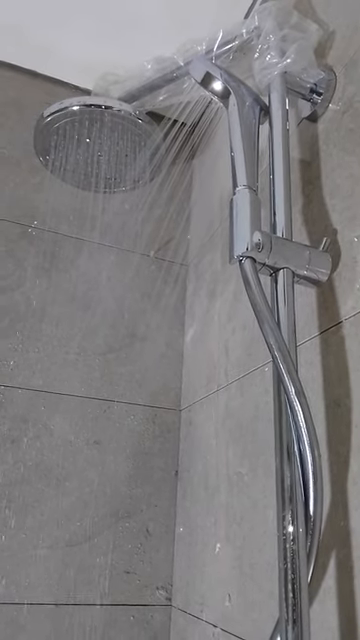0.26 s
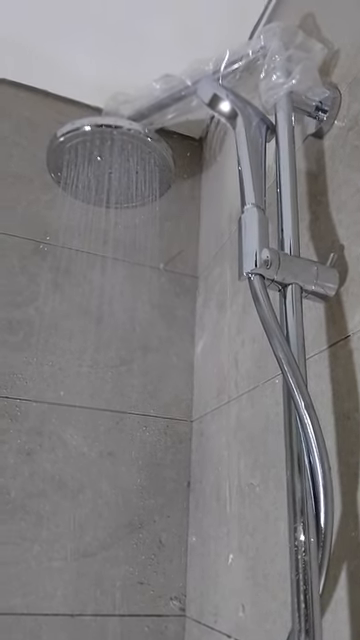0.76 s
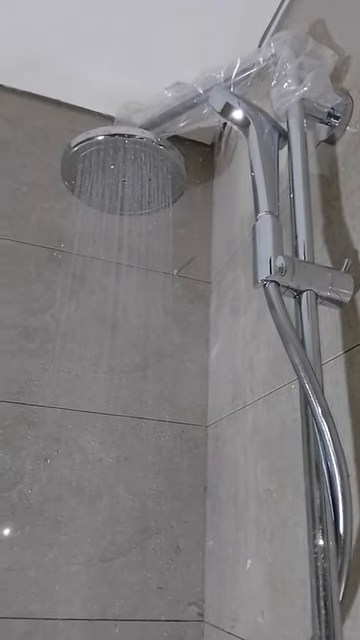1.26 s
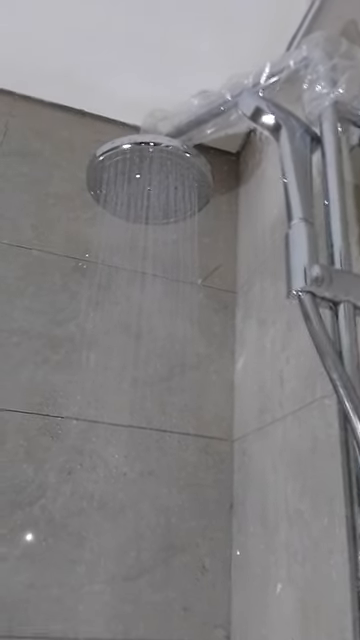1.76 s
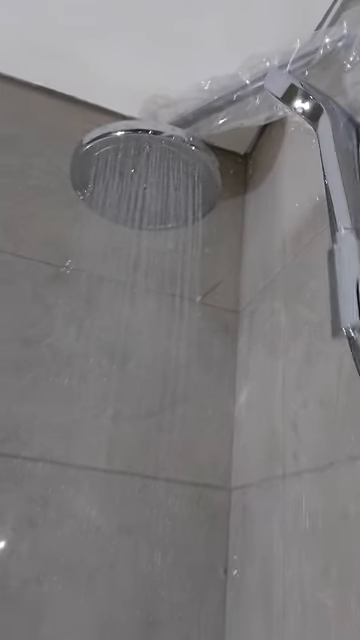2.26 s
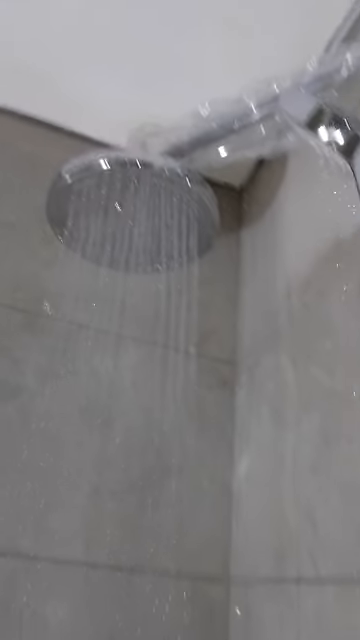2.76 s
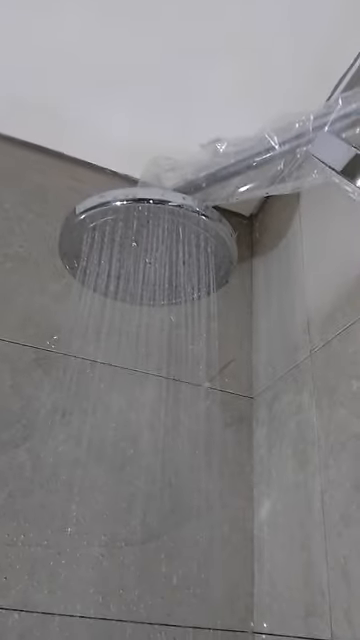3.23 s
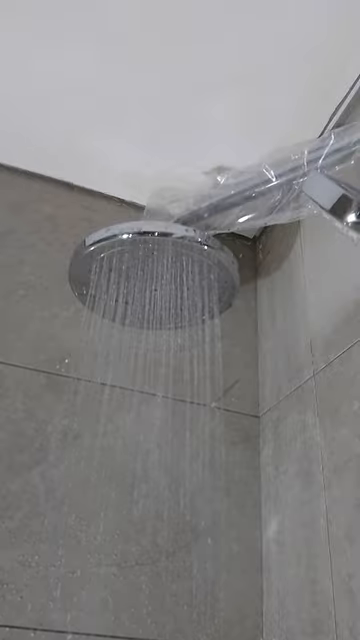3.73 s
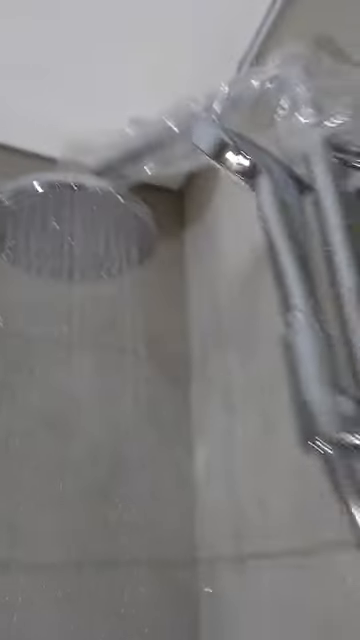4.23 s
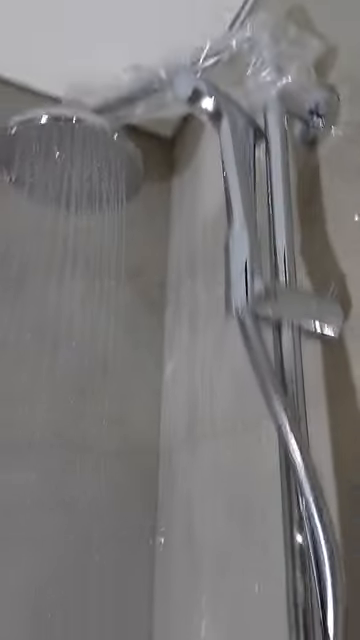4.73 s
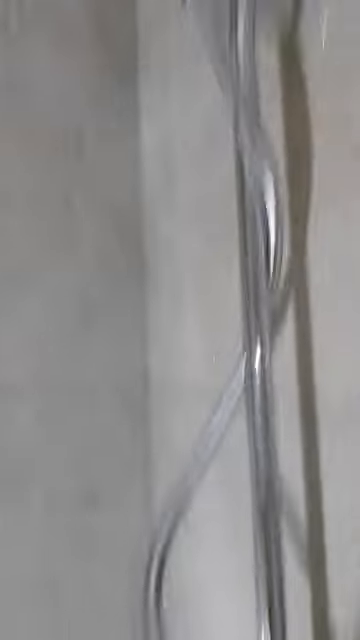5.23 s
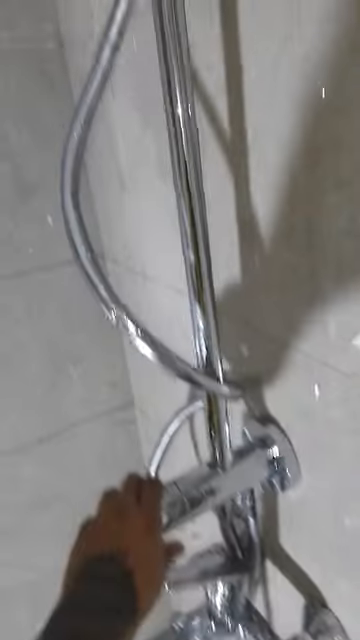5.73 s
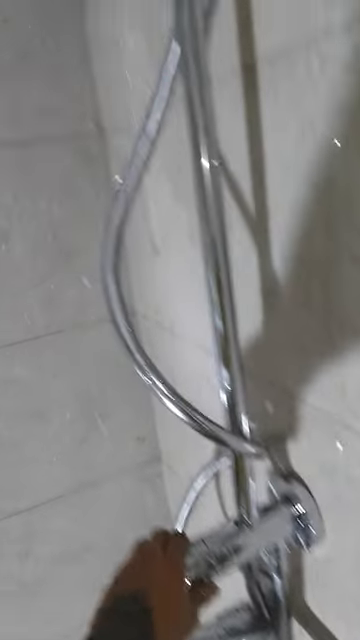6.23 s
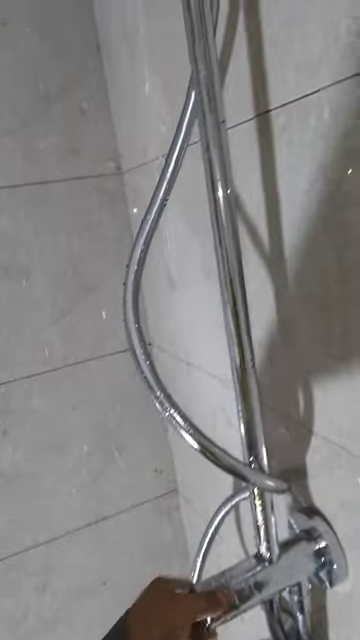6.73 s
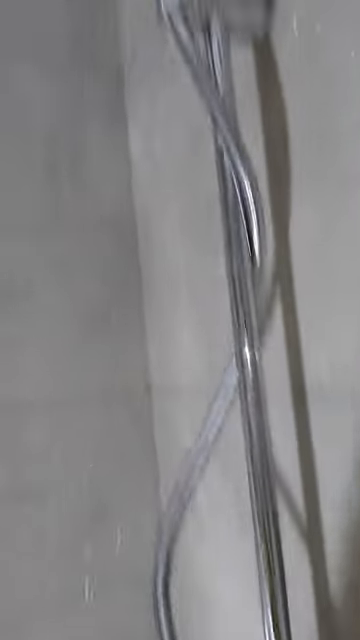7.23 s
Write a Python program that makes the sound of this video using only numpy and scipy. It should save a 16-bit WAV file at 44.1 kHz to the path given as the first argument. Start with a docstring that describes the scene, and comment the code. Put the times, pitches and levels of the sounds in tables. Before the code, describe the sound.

Shower water is already running at 0 s, with a brief stronger splash that at once drops to a thin, very bright hiss. Small spurts follow at 0.2-1.2 s, with sharp ticking drops and wet spits near 0.36 and 1.2 s. At 1.3 s the spray jumps fuller and stays steady, with a faint airy whistle until 2.4 s. From 2.6 to 3.3 s hollow ringing colours the water and close drops snap in clusters; more snap until 4.6 s, with soft dull taps. From 5 to 5.5 s the microphone lowers: the hiss reaches deeper and floor patter emerges. Level flickers at 5.5-5.7 s, and the clearest knock comes at 5.8 s. A splat, gurgle and hollow ring come near 6.55 s. From 6.9 s the microphone rises, and the spray weakens and thins, still running at 7.5 s. Tiled echo, faint rumble and hum stay beneath.

```python
"""In a tiled bathroom an overhead shower runs: the hand spray at first, then the rain head takes the whole flow.
Countless tiny noise puffs and pings make a bright hiss, and slower puffs a duller splash, with swelling bands.
Near drops snap as short high tones; blobs spit, bands of noise ring like hollows, and soft taps knock dully.
Water on the floor, low rumble (both shaped noise) and a faint mains hum (a sine) lie below. One hand-carried
microphone is lowered towards the mixer for a while: the hiss reaches lower there and the floor is louder."""
import sys
import numpy as np
from scipy import signal
from scipy.fft import rfft, irfft, next_fast_len
from scipy.io import wavfile
from scipy.ndimage import uniform_filter1d, map_coordinates

SR = 44100
rng = np.random.default_rng(int(sys.argv[2]) if len(sys.argv) > 2 else 0)


def persist_wave(psi):
    """Save psi, clipped to +-1, as 16-bit WAV."""
    counts = np.round(np.clip(psi, -1, 1) * 32767).astype(np.int16)
    wavfile.write(sys.argv[1], SR, np.atleast_2d(counts).T)


N = 329868  # length [samples]

# Strength of the spray at the microphone, before spurts and flutter: (time [s], level [dB])
SPRAY_LEVEL = [(0.0, -18.5), (0.08, -24), (0.3, -24), (0.6, -22.5), (0.71, -23), (1.1, -22.7), (1.27, -23),
               (1.3, -18), (1.54, -19.5), (2.3, -20), (2.7, -19), (3.6, -19.5), (4.15, -18), (4.22, -19.5),
               (4.92, -19.5), (5.15, -20), (5.42, -18.5), (5.48, -22), (5.57, -18.5), (5.63, -21.5),
               (5.71, -19), (6.1, -20.2), (6.86, -20.5), (7.23, -25.5), (7.48, -23.5)]
# Colour of the hiss, also used for the echo of the big drops: (frequency [Hz], relative level [dB per Hz])
HISS_COLOUR = [(3000, -12), (4200, -22), (5300, -18), (6500, -12), (8000, -7), (9200, -2.5), (10300, 1.65),
               (11200, 0.4), (12500, -3), (14000, -5.5), (15700, -8)]


def amp(db):
    """Turn decibels into a plain multiplier."""
    return 10 ** (np.asarray(db) / 20)


def unit(x):
    """Scale a sound to an average strength (rms) of 1."""
    return x / np.sqrt(np.mean(x ** 2) + 1e-20)


def along(points, hz):
    """Read a value at each frequency from (Hz, value) points, on a log frequency axis."""
    point_hz, values = np.transpose(points)
    return np.interp(np.log(hz + 1), np.log(point_hz + 1), values)


def curves(rows):
    """Draw one value per sample for each column after the time."""
    times, *columns = np.transpose(rows)
    return [np.interp(np.arange(N) / SR, times, column) for column in columns]


def wobble(rate):
    """Draw a smooth random curve through rate random points a second."""
    knots = rng.standard_normal(int(N * rate / SR) + 4)
    return map_coordinates(knots, [np.arange(N) * rate / SR])


def filtered(x, response):
    """Multiply each frequency in x by response(hz)."""
    size = next_fast_len(len(x) + SR // 4)  # spare room so the end does not wrap onto the start
    spectrum = rfft(x, size) * response(np.fft.rfftfreq(size, 1 / SR))
    return irfft(spectrum, size)[:len(x)]


def coloured(x, spectrum):
    """Shape x by the given (Hz, dB) spectrum, at rms 1."""
    return unit(filtered(x, lambda hz: amp(along(spectrum, hz))))


def add(track, start_s, sound):
    """Mix a short sound into the track at its start time."""
    part = track[round(start_s * SR):][:len(sound)]
    part += sound[:len(part)]


def impacts(rate, spread_db):
    """Drops land at random, rate a second, as single clicks of varied size and either sign, at rms 1."""
    lands = rng.random(N) < rate / SR
    size = amp(spread_db * np.minimum(rng.standard_normal(N), 2.4))  # no giant drops
    return unit(lands * size * rng.choice([-1, 1], N))


def scatter(x, t60):
    """Every impact in x leaves a puff of noise that falls 60 dB in t60 seconds; the energy is kept."""
    keep = amp(-60 / (t60 * SR)) ** 2  # energy left after one sample
    energy = signal.lfilter([1 - keep], [1, -keep], x ** 2)
    return np.sqrt(energy) * rng.standard_normal(N)


def tiled_room(x, t60, wet_db):
    """Each drop lands somewhere else, so each has its own diffuse echo off the tiles."""
    return x + amp(wet_db) * scatter(x, t60)


def lowered():
    """Microphone position: 0 up by the shower head, 1 down by the mixer."""
    lower_s, raise_s, move_s = 4.94, 6.9, 0.57  # start of each move, and the length of both
    t = np.arange(N) / SR
    return np.clip((t - lower_s) / move_s, 0, 1) - np.clip((t - raise_s) / move_s, 0, 1)


def spurts():
    """Spurts of heavier water change the splash and hiss gains [dB] quickly, then die back."""
    # Spurts: (time [s], splash gain [dB], hiss gain [dB])
    spurt_rows = [(0, 7, 0), (.225, 2.5, 0), (.35, 1.5, 2.5), (.51, -1, 3), (.84, 2, 4), (1.18, 0.5, 3),
                  (2.09, 3, 3), (2.66, 2, 3), (2.97, 1.5, 4), (3.11, 0.5, 2.5), (3.44, 1, 2),
                  (5.76, 1, 0.5), (6.55, 4, -0.5), (6.67, 1, 2.5), (7.28, 0, 2.5), (7.37, 3, 2.5)]
    rise_s = 0.013  # time to the top of a spurt
    start_s, *gains_db = np.transpose(spurt_rows)
    u = np.maximum(np.arange(N) / SR - start_s[:, None], 0) / rise_s
    return np.array(gains_db) @ (u * np.exp(1 - u))


def tiny_bubbles(count, low_hz, high_hz, spread_db):
    """Drops trap tiny bubbles that ping for about two milliseconds, each at its own pitch."""
    t = np.arange(SR // 300) / SR
    hz = rng.uniform(low_hz, high_hz, (count, 1))
    size = np.minimum(rng.standard_normal((count, 1)), 2.2)
    level = amp(spread_db * size - 60 * t / 0.0021)  # falls 60 dB in 2.1 ms
    attack = (1 - np.exp(-t / 0.00015)) ** 2
    pings = level * attack * np.sin(2 * np.pi * hz * t)
    where = rng.integers(0, N, (count, 1)) + np.arange(len(t))
    return unit(np.bincount(where.ravel(), pings.ravel(), N)[:N])


def hiss():
    """Fine droplets and spattering larger ones hit the tiles in slight clumps as the jets break up."""
    # How far down the hiss reaches: (time [s], lower edge [Hz])
    lower_edge = [(0, 5100), (.3, 5570), (.45, 6270), (1.2, 6240), (1.33, 5300), (1.8, 5000), (2.4, 5100),
                  (2.6, 5940), (2.9, 5800), (3.05, 5170), (3.4, 6130), (4.65, 6200), (4.85, 5800),
                  (5.05, 4960), (5.22, 4100), (5.95, 4200), (6.05, 5120), (6.9, 5140), (7.35, 6330)]
    # Change of colour with the microphone lowered: (frequency [Hz], gain [dB])
    low_tilt = [(4300, 4), (5400, 4.5), (7000, 2.5), (10300, -1.5), (15500, 1.5)]
    fine = impacts(rate=11000, spread_db=4.0)
    spatter = scatter(impacts(rate=650, spread_db=4.2), t60=0.008)
    clumps = amp(0.19 * wobble(24) + 0.42 * wobble(110))
    bubbles = tiny_bubbles(count=11000, low_hz=3880, high_hz=15760, spread_db=3.5)
    drops = clumps * (fine + amp(-5.0) * spatter + amp(-2.5) * bubbles)
    water = tiled_room(drops, t60=0.077, wet_db=-0.5)

    # Slice into short moments, so that the colour can change with time
    hz, t, z = signal.stft(coloured(water, HISS_COLOUR), SR, nperseg=512)
    hz = hz[:, None] + 1
    # Below its edge the hiss falls off steeply and leaves the splash bare
    edge_hz = np.interp(t, *np.transpose(lower_edge))
    edge = 1 / np.sqrt(1 + (edge_hz / hz) ** 80)
    down = np.interp(t, np.arange(N) / SR, lowered())
    tilt = amp(down * along(low_tilt, hz))
    sheet = unit(signal.istft(z * edge * tilt, SR, nperseg=512)[1][:N])

    flutter_db = 0.5 * wobble(12)  # the jets wander
    level_db = curves(SPRAY_LEVEL)[0] + spurts()[1] + flutter_db
    return amp(level_db) * sheet


def splash():
    """Heavier water trickles down slightly unevenly and slaps the wet surfaces."""
    # Strength of the splash before spurts: (time [s], level [dB])
    slap_level = [(0, -47.5), (1.2, -48), (1.35, -44.5), (2.7, -43.5), (3.75, -44), (4.3, -44.5),
                  (5.4, -44), (6.2, -46), (6.8, -44.5), (7.25, -49.5), (7.48, -47)]
    # Colour of the splash: (frequency [Hz], relative level [dB per Hz])
    splash_colour = [(150, -28), (400, -25), (1000, -13.5), (2000, -10), (3000, -4), (4200, 0.5), (6000, 4),
                     (9000, -16.5), (16000, -30)]
    trickle = amp(0.4 * wobble(14))
    slaps = tiled_room(trickle * impacts(rate=1900, spread_db=4.0), t60=0.21, wet_db=3.5)
    level_db = curves(slap_level)[0] + spurts()[0]
    return amp(level_db) * coloured(slaps, splash_colour)


def patchy(x, depth_db):
    """Narrow bands swell and drop, some 100 Hz wide and 100 ms long, most of all around 4-5 kHz."""
    hz, _, z = signal.stft(x, SR, nperseg=2048)
    field = rng.standard_normal(z.shape)
    for _ in range(2):  # smooth over frequency, then time
        field = uniform_filter1d(field, size=4, axis=0)
        field = uniform_filter1d(field, size=4, axis=1)
    # Share of the depth at each frequency: (Hz, share)
    shares = [(1000, .3), (2200, .33), (3800, 1), (4800, .9), (5600, .6), (7000, .15)]
    share = along(shares, hz)[:, None]
    gain = amp(depth_db * share * np.minimum(unit(field), 1))
    gain = gain / np.sqrt(np.mean(gain ** 2, axis=1, keepdims=True))
    return signal.istft(z * gain, SR, nperseg=2048)[1][:N]


def background():
    """Water washes over the floor and patters in a puddle, over low room rumble and fluttering mains hum."""
    # Strength of the water on the floor: (time [s], level [dB])
    wash_level = [(0, -66.5), (1.4, -65), (4.2, -65.5), (5.2, -64.5), (6.9, -65), (7.48, -64.5)]
    # Strength of the mains hum: (time [s], level [dB])
    hum_level = [(0, -70), (.9, -76), (1.3, -78.5), (3.1, -82), (3.3, -73), (4.7, -73.5), (5.7, -81),
                 (6.1, -70), (6.6, -74), (7, -84), (7.35, -71)]
    # Colours of floor, puddle and rumble: (frequency [Hz], relative level [dB per Hz])
    floor_colour = [(20, -22), (170, -21), (225, -4.5), (290, -1.5), (430, -2), (580, -3), (750, -6),
                    (1100, -8.5), (2500, -8.5), (8000, -31)]
    puddle_colour = [(170, -35), (300, -8), (560, 5), (900, 0), (1600, -20)]
    rumble_colour = [(10, -7), (30, 2.5), (50, -4), (75, -1.5), (110, -0.5), (135, -8), (165, -30),
                     (400, -48), (2000, -90)]
    floor_drops = scatter(impacts(rate=1500, spread_db=0.5), t60=0.089)
    wash = amp(curves(wash_level)[0]) * coloured(floor_drops, floor_colour)

    # The puddle is heard only while the microphone is lowered
    puddle_drops = scatter(impacts(rate=130, spread_db=3.5), t60=0.086)
    puddle = amp(-67.5) * lowered() * coloured(puddle_drops, puddle_colour)

    # The rumble is 2 dB weaker with the microphone lowered
    rumble_db = -75 - 2 * lowered() + 3.5 * wobble(11)
    rumble = amp(rumble_db) * coloured(rng.standard_normal(N), rumble_colour)

    flutter = 1 + 0.5 * wobble(15)
    phase = 2 * np.pi * 51 * np.arange(N) / SR + 0.93 * wobble(12)  # 51 Hz, slightly unsteady
    hum = amp(curves(hum_level)[0]) * unit(flutter * np.sin(phase))
    return wash + puddle + rumble + hum


def stray_drops(count):
    """Lesser near drops fall at random, as strong as the spray is: rows (s, peak dB, pitch Hz)."""
    over_db, spread_db, middle_hz = 10.5, 0.7, 10400  # peak over the spray, its scatter, middle pitch
    start_s = rng.uniform(0, N / SR, count)
    size, pitch = np.clip(rng.standard_normal((count, 2)), -2, 2).T
    db = np.interp(start_s, *np.transpose(SPRAY_LEVEL)) + over_db + spread_db * size
    return list(zip(start_s, db, middle_hz * np.exp(0.11 * pitch)))


def big_drops():
    """Each near drop snaps and rings for a few milliseconds at a shaky pitch; the tiles answer."""
    # The loudest drops: (time [s], peak before the final mix [dB], pitch [Hz])
    loud_drops = [(0.1537, -12, 10900), (0.3554, -4, 9000), (0.3566, -8, 10100), (0.7631, -4, 10600),
                  (0.9752, -8, 11300), (1.0205, -8, 13000), (1.1286, -1.5, 10100), (1.2378, -1.5, 10200),
                  (1.445, -15, 10700), (1.7018, -5, 10400), (2.5447, -7, 10600), (2.5853, -5, 10000),
                  (2.5917, -3, 10700), (2.7817, -11, 10400), (2.7949, -6, 10000), (2.9007, -2, 11100),
                  (2.9076, -4.5, 10000), (2.926, -2, 10800), (2.9424, -2, 10200), (3.1775, -2.5, 9650),
                  (3.2222, -5, 10600), (3.2308, -6, 10400), (3.2543, -3.5, 9900), (3.3216, -3, 10100),
                  (3.4531, -6, 10800), (3.7666, -1, 12100), (3.7755, -1, 10300), (3.8512, -2, 9500),
                  (3.9293, -2, 10200), (4.1285, -6, 10400), (4.1754, -3, 10500), (4.1837, -4, 10300),
                  (4.4208, -5, 10100), (4.5546, -4, 11000), (5.7803, -7, 10900), (5.795, -13, 11200),
                  (5.9378, -7, 9600), (6.2497, -3, 11000), (6.2859, -2, 10100), (6.4285, -5, 9100),
                  (6.4968, -6, 10800), (6.5063, -6, 9900), (6.5786, -5, 10500), (6.6916, -5, 11000),
                  (6.8168, -8, 10700), (6.891, -1, 10900), (6.9454, -8, 11100), (6.9856, -5, 10600),
                  (7.011, -6, 10600), (7.0616, -9, 10700), (7.2678, -7, 10300), (7.3615, -11, 10800),
                  (7.3992, -13, 10400)]
    track, t = np.zeros(N), np.arange(SR // 100) / SR
    for start_s, db, hz in list(loud_drops) + stray_drops(count=130):
        shake = 0.19 * np.cumsum(rng.standard_normal(len(t)))
        snap = np.sin(2 * np.pi * hz * t + shake)
        shape = (1 - np.exp(-t / 0.00018)) * amp(-60 * t / 0.0034)
        add(track, start_s, amp(db) * snap * shape / shape.max())
    echo = filtered(scatter(track, t60=0.27), lambda hz: amp(along(HISS_COLOUR, hz)))
    mix = amp(-2.7) * track + amp(-13) * echo
    return filtered(mix, lambda hz: 1 / np.sqrt(1 + (6900 / (hz + 1)) ** 18))  # cut below 6900 Hz


def splats():
    """Blobs of water splat on the wall: each bursts at once into a short, duller spit that dies away."""
    # Blobs: (time [s], starting level [dB], centre pitch [Hz], time to fall 60 dB [s])
    blobs = [(.234, -50, 3100, 0.11), (.362, -27, 7400, .1), (1.185, -27, 7800, 0.29),
             (1.439, -42, 4200, .03), (1.836, -41, 4000, .03), (2.645, -53, 1900, .2),
             (6.564, -24.5, 7360, 0.13), (6.993, -27.5, 6640, .04), (7.287, -34, 6130, .04),
             (7.409, -41, 4500, 0.037)]
    width = 0.35  # bandwidth as a share of the pitch
    track, t = np.zeros(N), np.arange(SR // 4) / SR
    for start_s, db, centre_hz, t60 in blobs:
        noise = rng.standard_normal(len(t))
        spit = filtered(noise, lambda hz: 1 / (1 + (2 * (hz / centre_hz - 1) / width) ** 4))
        add(track, start_s, amp(db - 60 * t / t60) * unit(spit))
    return track


def ringing(bands, length, ratio=1):
    """Water excites narrow resonances (Hz, width Hz, dB): a quick rise, then a slow, uneven fade."""
    ramp_s, fade_db = 0.03, 7.5  # ramp at either end, and fall over the whole length
    t = np.arange(round(length * SR)) / SR

    def response(hz):
        return sum(amp(db) / (1 + (2 * (hz - ratio * centre) / width) ** 4) for centre, width, db in bands)

    gate = np.clip(np.minimum(t, length - t) / ramp_s, 0, 1)
    flutter_db = 2 * wobble(40.5)[:len(t)]  # the jet excites them unevenly
    level_db = flutter_db - fade_db * t / length
    return gate * amp(level_db) * unit(filtered(rng.standard_normal(len(t)), response))


def hollow_rings():
    """A jet strays over something hollow; thin whistles and low gurgles also ring out as narrow noise."""
    # Jet over the hollow: (start [s], length [s], level before fade [dB], pitch ratio)
    hollow_hits = [(2.616, 0.39, -42, 0.99), (2.952, 0.34, -45, 1), (6.541, 0.32, -46.5, 0.93)]
    # Resonances of the hollow: (frequency before the pitch ratio [Hz], width [Hz], relative level [dB])
    cavity = [(3674, 210, 0), (4140, 170, 6), (5200, 1200, -2.5)]
    # Whistles and gurgles: (start [s], length [s], level before fade [dB], frequency [Hz], width [Hz])
    whistles = [(.55, .08, -48, 5100, 300), (0.547, 0.069, -56, 1670, 500), (.84, 0.14, -47, 5000, 900),
                (1.321, 0.68, -48, 4990, 190), (1.852, 0.55, -48, 4940, 190),
                (5.142, 0.5, -46.5, 4280, 450), (6.05, 0.27, -50.5, 4540, 300), (6.508, .1, -66, 480, 300),
                (6.582, 0.28, -65, 293, 110), (7.39, 0.059, -48, 4800, 1100)]
    track = np.zeros(N)
    for start_s, length, db, ratio in hollow_hits:
        add(track, start_s, amp(db) * ringing(cavity, length, ratio))
    for start_s, length, db, hz, width in whistles:
        add(track, start_s, amp(db) * ringing([(hz, width, 0)], length))
    return track


def taps():
    """Soft taps and knocks: a very short push with a faint noise tail and no ring, then dulled."""
    # Taps: (time [s], strength before colouring [dB])
    tap_rows = [(2.783, -29), (2.926, -28), (3.766, -31), (3.929, -37), (4.175, -30), (4.717, -30),
                (5.7955, -21.5), (5.938, -31)]
    # Colour of a tap: (frequency [Hz], gain [dB])
    tap_colour = [(20, -1), (100, 1), (220, 3), (400, -3), (700, -0.5), (3000, 3), (5500, -20),
                  (16000, -48)]
    track, t = np.zeros(N), np.arange(SR // 20) / SR
    for start_s, db in tap_rows:
        tail = 0.013 * rng.standard_normal(len(t)) * amp(-60 * t / 0.04)
        push = amp(-60 * t / 0.00027) + tail
        add(track, start_s, amp(db) * push)
    return filtered(track, lambda hz: amp(along(tap_colour, hz)))


def scene():
    """Mix all the layers and send the same sound to both channels."""
    spray = patchy(hiss() + splash(), depth_db=6.5)
    mono = spray + hollow_rings() + big_drops() + splats() + taps() + background()
    return np.array([mono, mono])


def record(dry):
    """The recorder keeps nothing above its band limit."""
    top_hz = 15780
    return np.array([filtered(channel, lambda hz: hz < top_hz) for channel in dry])


dry = scene()
out = record(dry)
persist_wave(out)
```